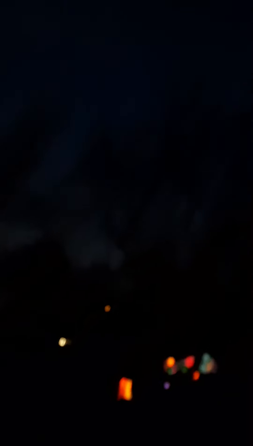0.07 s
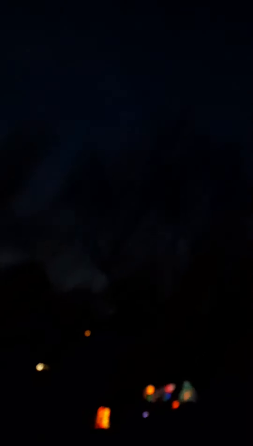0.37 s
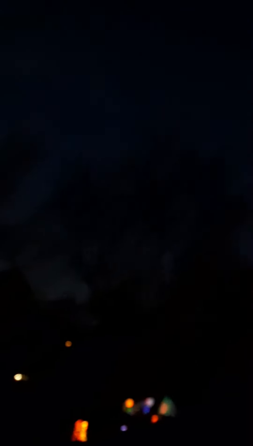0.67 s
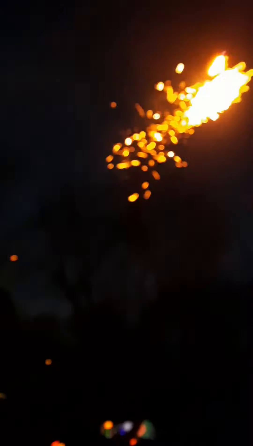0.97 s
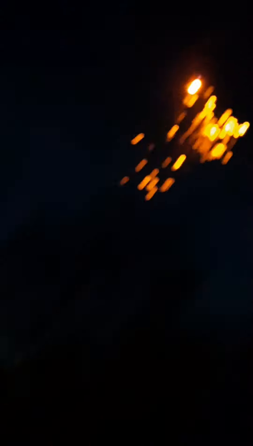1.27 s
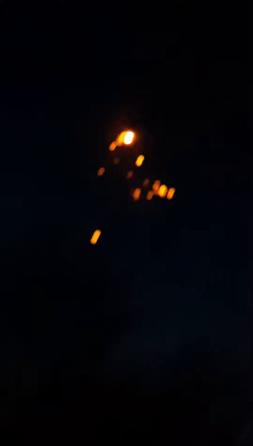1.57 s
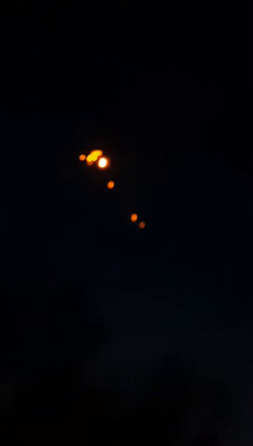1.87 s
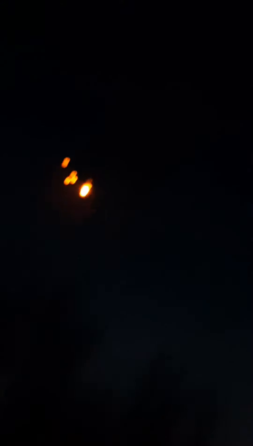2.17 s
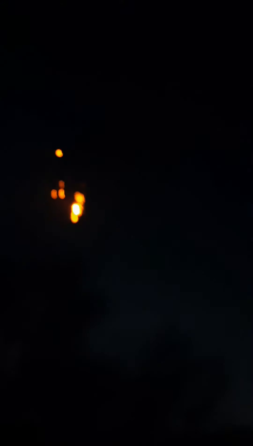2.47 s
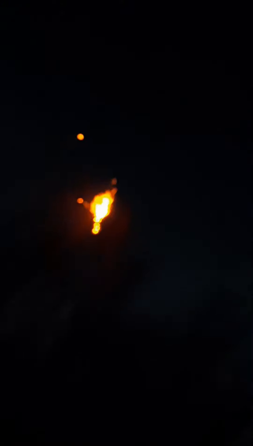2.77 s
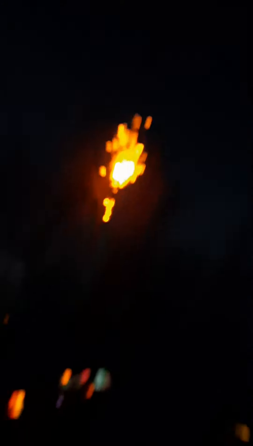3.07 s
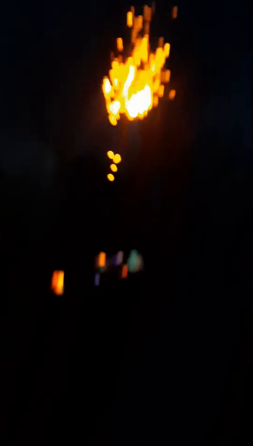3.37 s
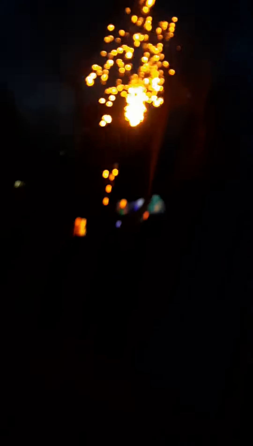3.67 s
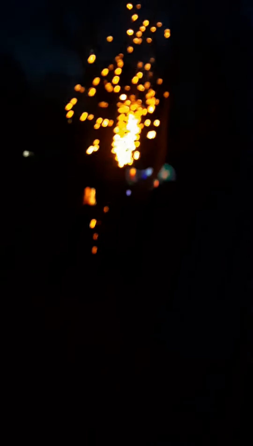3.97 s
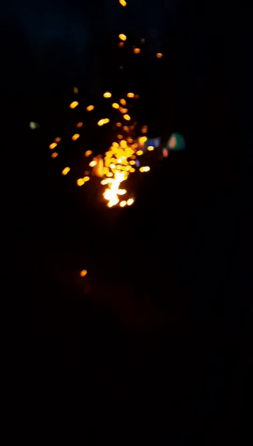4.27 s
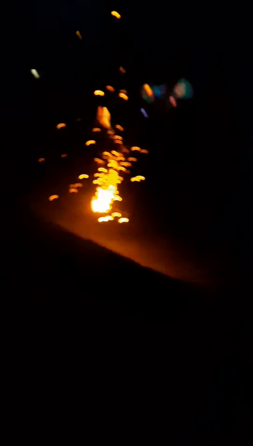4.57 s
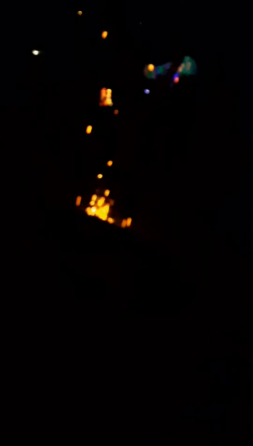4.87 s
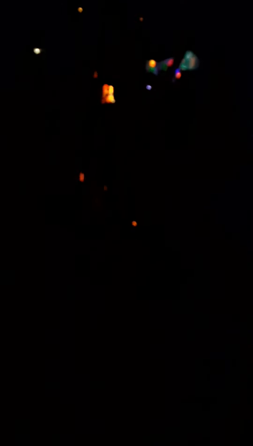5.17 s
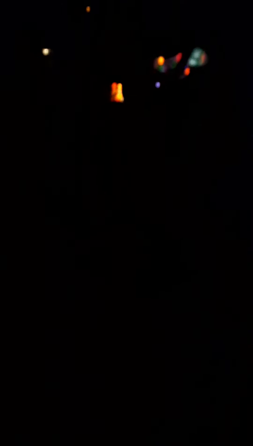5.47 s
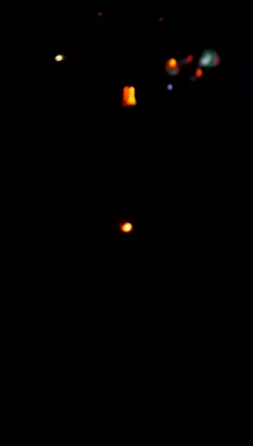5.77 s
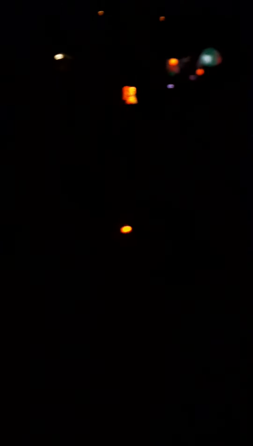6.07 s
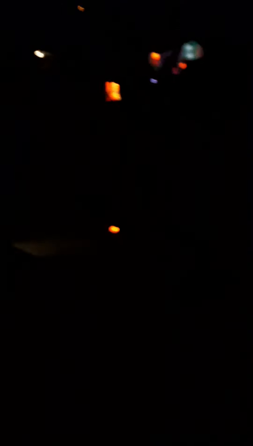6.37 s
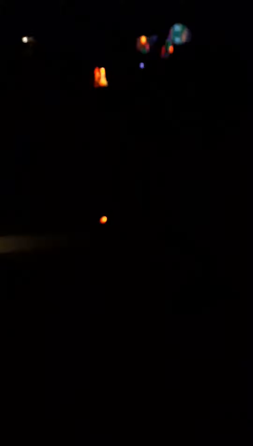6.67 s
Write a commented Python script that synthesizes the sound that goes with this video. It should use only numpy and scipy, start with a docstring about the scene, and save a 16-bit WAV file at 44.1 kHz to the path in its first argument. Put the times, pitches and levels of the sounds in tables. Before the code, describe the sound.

The scene opens outdoors at night with the faint hum and hush of far traffic. At about 0.85 seconds a homemade cannon ignites with a sharp snap, followed almost instantly by one very loud blast, a deep boom from the barrel and a brief hiss of gas. Echoes slap back from houses and trees until about 1.5 seconds, and a low rumble dies away by around 2 seconds. The microphone's level ducks with the shot and creeps back. Around 2.6 seconds a soft, low rush swells, then slowly fades, with a very faint fizz of sparks between 3 and 5 seconds. From 5.5 seconds clothing rustles quietly close to the microphone, and a small hard object gives scattered light clicks. It knocks with a dull thud at about 6.3 seconds and makes a short, rattling scrape near 6.7 seconds, all far quieter than the shot.

```python
"""Outdoors at night, over the hum and hush of far traffic, a homemade cannon fires a burning shot.
Ignition snaps in the chamber, the blast sets the barrel booming, and houses and trees reflect it as
echoes and a rumble. The microphone's gain ducks and creeps back. A soft, low background rush swells
and slowly fades, with a faint fizz of sparks; close by, clothing rustles and a small hard object
clicks, knocks and scrapes."""
import sys
import numpy as np
from scipy import signal
from scipy.fft import rfft, irfft, next_fast_len
from scipy.io import wavfile
from scipy.ndimage import uniform_filter1d, minimum_filter1d, map_coordinates

SR = 44100
rng = np.random.default_rng(int(sys.argv[2]) if len(sys.argv) > 2 else 0)


def log_audio(samples):
    """Write samples as a 16-bit WAV file to the path given in sys.argv[1]."""
    # one column per channel
    frames = np.atleast_2d(samples).T
    # limit to full scale, then quantise
    limited = np.clip(frames, -1, 1)
    pcm = np.round(limited * 32767).astype(np.int16)
    wavfile.write(sys.argv[1], SR, pcm)


N = 300321


def amp(db):
    """Amplitude ratio of a level in decibels."""
    return np.exp(np.asarray(db) * (np.log(10) / 20))


def unit(x):
    """Normalisation to rms 1."""
    return x / np.sqrt(np.mean(x ** 2) + 1e-20)


def along(points, hz):
    """Interpolation of (Hz, value) points on a logarithmic frequency axis."""
    freqs, values = np.transpose(points)
    return np.interp(np.log(hz + 1), np.log(freqs + 1), values)


def swell(s, db, rise, fall):
    """Exponential growth to a peak at s seconds, then exponential decay."""
    t = np.arange(N) / SR
    return amp(db) * np.exp(-np.minimum(np.maximum((s - t) / rise, (t - s) / fall), 20))


def fade_in(s, rise):
    """A smooth onset: the gain climbs from 0 to 1 around s seconds."""
    return (1 + np.tanh((np.arange(N) / SR - s) / (2 * rise))) / 2


def wobble(rate, size=N):
    """Random modulation: a smooth curve through rate knots a second."""
    knots = rng.standard_normal(int(size * rate / SR) + 4)
    fine = np.arange(8 * len(knots) - 8) / 8
    return np.interp(np.arange(size) * rate / SR, fine, map_coordinates(knots, [fine]))


def filtered(x, response):
    """Linear filtering: the spectrum of x is multiplied by response(Hz)."""
    n = x.shape[-1]
    padded = next_fast_len(n + 8192)
    return irfft(rfft(x, padded) * response(np.fft.rfftfreq(padded, 1 / SR)), padded)[..., :n]


def causal(gain_db, size=8192):
    """Minimum phase: the sharpest pulse whose spectrum follows gain_db(Hz)."""
    cepstrum = irfft(np.log(amp(gain_db(np.fft.rfftfreq(size, 1 / SR)))))
    cepstrum[1:size // 2] *= 2
    cepstrum[size // 2 + 1:] = 0
    return irfft(np.exp(rfft(cepstrum)))


def diffuse(size, apart_hz=1100):
    """A diffuse field: white noise, coherent between channels in the bass, incoherent in the treble."""
    mid, side = rng.standard_normal((2, size))
    side = filtered(side, lambda hz: (hz + 70) / np.hypot(hz + 70, apart_hz))
    return np.array([mid + side, mid - side]) / np.sqrt(2)


def rush(spectrum, size=N):
    """Spectral shaping: coloured diffuse noise of rms 1."""
    return unit(filtered(diffuse(size), lambda hz: amp(along(spectrum, hz))))


def lean(x, balance):
    """Level panning tilts each frequency to the left or right."""
    return filtered(x, lambda hz: amp(np.outer([.5, -.5], along(balance, hz))))


def add(track, s, sound):
    """Superposition of a sound on the track at s seconds."""
    start = round(s * SR)
    track[:, start:start + sound.shape[-1]] += sound[..., :N - start]


def ring(modes, start, attack):
    """Free vibration: damped modes, all excited at one moment."""
    out = np.zeros((1, N))
    t = np.arange(int(SR * max(t60 for *_, t60 in modes))) / SR
    sound = sum(amp(db - 60 * t / t60) * np.sin(2 * np.pi * hz * t) for hz, db, t60 in modes)
    add(out, start, sound * (1 - np.exp(-t / attack)))
    return out


def cracks(rows, spectrum, ragged_db, right_lead=2, front_t60=0.0055, order=2):
    """Impulsive arrivals: a ragged front, then scatter; each level is the energy spread over 5 ms."""
    out, t = np.zeros((2, N)), np.arange(SR // 8) / SR
    pulse = causal(lambda hz: along(spectrum, hz))
    burst = lambda db, t60: amp(db) * unit(diffuse(len(t)) * amp(-60 * t / t60)) / np.sqrt(len(t))
    for s, db, scatter_db, t60, corner_hz, pan_db in rows:
        spray = burst(ragged_db, front_t60) + burst(scatter_db, t60)
        spray[0, right_lead] -= 1  # the front reaches the left port a few samples late
        spray[1, 0] -= 1
        lowpass = signal.butter(order, min(corner_hz, .45 * SR), fs=SR, output="sos")
        sound = signal.fftconvolve(signal.sosfilt(lowpass, spray), pulse[None], axes=1)
        sound *= np.sqrt(.005 * SR * 2 / np.sum(sound ** 2))
        add(out, s, sound * amp(db + np.array([[pan_db], [-pan_db]]) / 2))
    return out


# Swells of an engine. Each row: peak time in seconds, level in dB, rise and fall in seconds.
ENGINE_SWELLS = [(0, -62, .1, 0.2006), (.66, -52.5, 0.089, 0.252), (1.95, -60, .4, .25),
                 (6.0, -61, .08, 0.25)]
# The hush of traffic. Each row: frequency in Hz, spectral density in dB.
HUSH_SPECTRUM = [(20, -19), (33, -15.5), (45, 3), (110, 3), (220, 3), (400, -2), (800, -4), (1600, -13),
                 (2200, -21), (2650, -37), (5500, -39), (9000, -51), (12000, -42.5), (16000, -42)]

def traffic(hush_db=-53.0, hum_db=-68, hum_hz=88, waver_hz=1.8, rough=.28):
    """Amplitude and frequency modulation roughen a far engine's drone over a broadband hush."""
    phase = 2 * np.pi * np.cumsum(hum_hz + waver_hz * wobble(5)) / SR
    effort = amp(hum_db) + sum(swell(*rev) for rev in ENGINE_SWELLS)
    sidebands = rough * (wobble(28) * np.sin(phase) + wobble(28) * np.cos(phase))
    hum = effort * unit((np.sin(phase) + sidebands) * amp(1.9 * wobble(9.5)))
    return amp(hush_db + 0.72 * wobble(5.9)) * rush(HUSH_SPECTRUM) + hum


# Pressure fronts. Each row: start in seconds, level in dB, relative scatter in dB,
# its t60 in seconds, treble corner in Hz, leftward pan in dB.
IGNITION_FRONTS = [(.8468, -10.5, -1, 0.022, 2199, 3.5), (.8492, -11, 11.5, 0.03, 15160, -3)]
BLAST_FRONTS = [(.8809, -2, -2.5, .014, 9500, 0), (.8862, -22, 14, .035, 9000, 0),
                (.8882, -13.5, -3, .03, 1000, 0)]  # the blast, a spit of hot gas, the bounce off the ground
# Ignition, blast and gas jet. Each row: frequency in Hz, spectral density in dB.
SNAP_SPECTRUM = [(100, -31.5), (380, -21.5), (700, -0.5), (900, -8.5), (1100, -3.5), (1800, 1.5),
                 (2700, -17), (4700, -7), (7200, -16.5), (9000, -13.5), (13000, -16)]
MUZZLE_SPECTRUM = [(6, -45), (25, -19), (70, -2), (150, 2), (270, -4), (380, -0.5), (750, -5), (1300, -11),
                   (2000, -7), (2650, -11), (3100, -19), (4250, -13), (6500, -23), (7300, -22), (8600, -31),
                   (11300, -18), (15000, -16)]
JET_SPECTRUM = [(1500, -25), (3000, -10), (4500, 0), (6000, 1), (7500, -6), (9000, -12), (11500, -5),
                (16000, -8)]
# Decaying tones. Each row: frequency in Hz, level in dB, t60 in seconds.
CHAMBER_MODES = [(705, -16, .04), (1104, -13.5, .028), (1790, -17, 0.017), (2050, -25.5, .055),
                 (3020, -29, .04), (4350, -27, .04), (4800, -28, 0.043), (7200, -25, 0.045),
                 (11150, -28, .035)]
BOOM_TONES = [(72, -6, 0.145), (62, -20, .7), (137.2, -6.5, 0.089), (162.85, -17, .36), (197, -17, .1),
              (398, -12.5, .1), (562, -19, 0.11), (673, -28, .3), (796, -22, .09), (984, -28, .28),
              (1249, -26, 0.12), (1519, -28, .13), (2042, -27, .25), (2427, -25, 0.037), (4250, -29, 0.1)]  # the barrel's boom, and faint tones that ring on after the shot

def cannon():
    """Impulse excitation: ignition rings the chamber, the blast booms in the barrel, gas hisses out."""
    snap = cracks(IGNITION_FRONTS, SNAP_SPECTRUM, ragged_db=-6, right_lead=4)
    chamber = ring(CHAMBER_MODES, start=.8465, attack=0.00056)
    blast = cracks(BLAST_FRONTS, MUZZLE_SPECTRUM, ragged_db=-5)
    boom = ring(BOOM_TONES, start=.8840, attack=0.00085)
    hiss = swell(s=.925, db=-36, rise=.02, fall=.022) * rush(JET_SPECTRUM)
    return snap + chamber + blast + boom + hiss


# Scatter from the ground, near trees and far trees. Each row: start in seconds, level in dB,
# nominal t60 in seconds, rise in seconds, treble corner in Hz.
SCATTER_TAILS = [(0.853, -34.5, 0.37, .002, 15000), (.886, -21.5, 0.556, .002, 16000),
                 (.938, -21, 0.5, .002, 16000), (.945, -19.4, 0.95, .002, 16000),
                 (1.19, -46.3, 1.4, .02, 5000)]
# Air absorption. Each row: frequency in Hz, factor on the nominal t60.
AIR_DECAY = [(50, 1.05), (200, 1.22), (1200, 1.25), (2100, 1.08), (2900, .92), (6000, 0.64), (8500, .52),
             (13000, .42)]
# The scattered sound. Each row: frequency in Hz, spectral density in dB.
TREE_SPECTRUM = [(6, -52), (25, -17), (42, -4), (62, 14), (80, 11), (100, 7), (160, 6), (280, -5.5),
                 (480, -5), (650, -1.5), (780, -4.5), (930, -3), (1300, -7.7), (2300, -6.7), (3000, -13),
                 (5500, -11.5), (9000, -23), (13000, -20.5)]

def rumble(grain_db=1.8, surge_db=1.5, ripple_db=2.0):
    """Reverberation: countless small echoes roll away in surges; the air absorbs their treble first."""
    out = np.zeros((2, N))
    ripple = amp(ripple_db * rng.standard_normal((513, 1)))
    for s, db, t60, rise, corner_hz in SCATTER_TAILS:
        hz, t, bands = signal.stft(rush(TREE_SPECTRUM, size=2 * SR), SR, nperseg=1024)
        hz = hz[:, None]
        bands *= np.where(hz > 500, ripple, 1)  # crossing paths favour some frequencies
        bands /= np.hypot(1, (hz / corner_hz) ** 4)
        bands *= amp(-60 * t / (t60 * along(AIR_DECAY, hz)))
        tail = signal.istft(bands, SR, nperseg=1024)[1]
        age = np.arange(tail.shape[1]) / SR
        clumps = unit(amp(grain_db * wobble(350, len(age)) + surge_db * wobble(70, len(age))))
        add(out, s, amp(db) * tail * clumps * (1 - np.exp(-age / rise)))
    return out


# Echoes from houses and trees. Each row: arrival in seconds, level in dB, treble corner in Hz.
REFLECTIONS = [(0.9363, -5, 13000), (0.9500, -13.5, 7500), (0.9597, -17.5, 5000), (.9910, -12.5, 1250),
               (1.1703, -20, 950), (1.2950, -38, 700), (1.3450, -38, 700)]
# The reflected blast. Each row: frequency in Hz, spectral density in dB.
WALL_SPECTRUM = [(6, -51.5), (25, -24.5), (80, -5.5), (160, 7.5), (300, -7), (500, -6), (900, 0),
                 (1300, -1.5), (2100, -1.5), (3000, -10), (5500, -7), (9000, -23.5), (13000, -19.5)]

def echoes(first_t60=0.032, smearing=0.68, scatter_db=2.5, pan_db=-0.93):
    """Reflection: the longer its path, the duller and more smeared an echo returns."""
    fired, rows = BLAST_FRONTS[0][0], []
    for s, db, corner_hz in REFLECTIONS:
        delay_ratio = (s - fired) / (REFLECTIONS[0][0] - fired)
        rows.append((s, db, scatter_db, first_t60 * delay_ratio ** smearing, corner_hz, pan_db))
    return cracks(rows, WALL_SPECTRUM, ragged_db=3, order=4)


# Echoes from single trunks. Each row: arrival in seconds, level in dB, treble corner in Hz.
TRUNK_REFLECTIONS = [(1.0043, -24, 2400), (1.0085, -28, 2200), (1.0392, -19.5, 2300), (1.0660, -29, 1700),
                     (1.0845, -29, 2700), (1.1760, -41, 9000), (1.2190, -41, 2000), (1.4490, -41.5, 1100),
                     (1.5030, -53, 2600)]
# Their colour. Each row: frequency in Hz, spectral density in dB.
TRUNK_SPECTRUM = [(100, -12.5), (700, 1.5), (2100, 0), (3000, -6), (5500, -5), (7500, -15), (13000, -22.5)]

def trunk_echoes(scatter_db=1, t60=0.028):
    """Discrete reflections from single trunks tick through the rumble."""
    rows = [(s, db, scatter_db, t60, hz, 0) for s, db, hz in TRUNK_REFLECTIONS]
    return cracks(rows, TRUNK_SPECTRUM, ragged_db=2.0)


# Showers of sparks. Each row: peak time in seconds, level in dB, rise and fall in seconds.
SPARK_SHOWERS = [(3.08, -82, .08, .2), (3.62, -73.5, 0.2, 0.26), (4.85, -84, .15, .15)]
# Background rush and sparks. Each row: frequency in Hz, spectral density in dB.
RUSH_SPECTRUM = [(30, -16.5), (80, 5.5), (220, 9), (450, 6), (900, 3), (1600, 2), (2200, -9), (2700, -31.5),
                 (4500, -24), (9000, -36), (12000, -27.5), (16000, -24.5)]
SPARK_SPECTRUM = [(1500, -30), (3200, -4.5), (4700, 1.5), (7000, -7.5), (15000, -5.5)]

def night_rush(onset_s=2.6, rush_db=-55.6, fade_db_per_s=2.4, flutter_db=0.53, sputter_db=1.0):
    """Modulated noise: a soft, low background rush swells and slowly fades; sparks fizz faintly."""
    envelope = fade_in(onset_s, rise=0.22) * amp(rush_db - fade_db_per_s * (np.arange(N) / SR - onset_s))
    sputter = unit(amp(sputter_db * wobble(120) + 1.2 * wobble(12)))
    fizz = sum(swell(*shower) for shower in SPARK_SHOWERS) * sputter * rush(SPARK_SPECTRUM)
    return amp(flutter_db * wobble(11)) * envelope * rush(RUSH_SPECTRUM) + fizz


RUSTLE_S = 5.46  # the clothing starts to move
# Short scuffs of cloth. Each row: peak time in seconds, level in dB, fall in seconds.
CLOTH_SCUFFS = [(5.522, -68, 0.029), (5.652, -66.5, 0.0148), (5.9467, -47, 0.0036), (5.966, -48, 0.0183),
                (6.274, -46, 0.0105), (6.72, -63.5, 0.0246)]
# Steady rustle and scuffs. Each row: frequency in Hz, spectral density in dB.
RUSTLE_SPECTRUM = [(1500, -8), (2800, -5), (3500, -5), (4200, 0), (6000, 3), (7700, -2), (8700, -12),
                   (11000, -3.5), (16000, -3)]
SCUFF_SPECTRUM = [(100, -3), (700, 3), (1200, 1), (1750, -2), (2060, 6), (2500, 2), (3000, -7), (3800, 2),
                  (4700, -3.5), (5700, 0), (7500, -2.5), (8700, -18), (11300, -10.5), (16000, -16)]

def clothing(start_db=-74, growth_db_per_s=4, grain_db=2.0):
    """Friction noise: clothing scuffs, and rustles louder as it moves ever more."""
    effort_db = start_db + growth_db_per_s * (np.arange(N) / SR - RUSTLE_S) + 1.8 * wobble(9)
    rustle = amp(effort_db) * fade_in(RUSTLE_S, rise=.025) * rush(RUSTLE_SPECTRUM)
    scuffs = sum(swell(s, db, 0.67 * fall, fall) for s, db, fall in CLOTH_SCUFFS) * rush(SCUFF_SPECTRUM)
    return (rustle + scuffs) * unit(amp(grain_db * wobble(820)))


# Clicks of a small hard object. Each row: start in seconds, level in dB, leftward pan in dB.
CONTACTS = [(5.4656, -66, -0.5), (5.541, -62, -1), (5.5595, -59, -3), (5.645, -58, 0.5), (5.653, -62, -3),
            (5.946, -48, -5.5), (6.038, -43, -1.5), (6.0484, -48.5, 2.5), (6.089, -57, 2), (6.217, -47, -3),
            (6.2273, -49, -5), (6.2562, -34.5, -9.5), (6.6587, -50.5, 3.5)]
# A light click. Each row: frequency in Hz, spectral density in dB.
CLICK_SPECTRUM = [(6, -39.5), (60, -4.5), (300, 6.5), (800, 2), (2000, 1), (3100, -8), (3750, 2), (4800, 5),
                  (5300, 2), (5850, 11), (6700, -2), (7400, 0), (8700, -6), (11500, -3.5), (16000, -1.5)]
CLICK_T60_S, CLICK_SCATTER_DB = 0.0166, 4

def clicks(typical_db=-44.5, typical_hz=9500, brighter_db=20.5, shorter_db=6.5):
    """Impact noise: a harder contact is brighter and shorter."""
    rows = []
    for s, db, pan_db in CONTACTS:
        t60 = CLICK_T60_S / 2 ** ((db - typical_db) / shorter_db)
        corner_hz = typical_hz * 2 ** ((db - typical_db) / brighter_db)
        rows.append((s, db, CLICK_SCATTER_DB, t60, corner_hz, pan_db))
    return cracks(rows, CLICK_SPECTRUM, ragged_db=-2)


# Resonances of the object. Each row: frequency in Hz, relative level in dB, t60 in seconds.
SHELL_MODES = [(1550, -15.5, 0.024), (2018, -6.5, 0.021), (2486, -5.5, 0.0171), (3660, -25, 0.0153),
               (5730, -11, 0.0118)]

def shell(contacts):
    """Modal ringing: every contact excites the same resonances of the object."""
    return sum(amp(db) * ring(SHELL_MODES, s, attack=0.00022) for s, db, *_ in contacts)


def ticks(count=24, level_db=-72.5, spread_db=2, corner_hz=6004):
    """Random impulses: faint ticks come while the clothing moves."""
    chance = rng.random((count, 2))
    times = RUSTLE_S + (N / SR - RUSTLE_S) * (np.arange(count) + chance[:, 0]) / (count + 1)
    levels = level_db + spread_db * (2 * chance[:, 1] - 1)
    rows = [(s, db, CLICK_SCATTER_DB, CLICK_T60_S, corner_hz, 0) for s, db in zip(times, levels)]
    return cracks(rows, CLICK_SPECTRUM, ragged_db=-5)


# The object strikes and drops back. Each row: start in seconds, level in dB, relative scatter in dB,
# its t60 in seconds, treble corner in Hz, leftward pan in dB.
KNOCK_IMPACTS = [(6.2563, -38.5, 2.5, 0.0144, 2200, -6), (6.2632, -40, 2.5, 0.11, 3000, 10)]
# Their colour. Each row: frequency in Hz, spectral density in dB.
KNOCK_SPECTRUM = [(6, -40), (60, 4), (300, 14), (700, 12), (1300, 9), (2400, 7), (3100, -7), (4200, 1),
                  (5900, 10.5), (6800, -4), (7500, 2), (8700, -3), (12500, 1), (16000, -6)]
# The thud as it settles. Each row: frequency in Hz, level in dB, t60 in seconds.
THUD_MODES = [(230, -43, .07), (585, -41, .035), (724, -31, 0.02), (973, -44, 0.07), (1290, -43, .035)]

def knock():
    """Damped vibration: the object knocks against something and settles with a dull thud."""
    thud = ring(THUD_MODES, start=6.2635, attack=0.00041)
    return cracks(KNOCK_IMPACTS, KNOCK_SPECTRUM, ragged_db=-5) + thud


def rattle(start_s=6.654, first_db=-39, gap_s=.0022, count=7, loss_db=0.2):
    """Chatter: a quick, uneven run of weakening contacts rings the object as it scrapes."""
    k = np.arange(count)
    times = start_s + gap_s * (k + rng.uniform(-.5, .5, count))
    return shell(zip(times, first_db - loss_db * k))


# The scraping object. Each row: frequency in Hz, spectral density in dB.
SCRAPE_SPECTRUM = [(100, -9), (1200, -7), (1750, -3), (2050, 8), (2250, 3), (2500, 7), (3000, -1),
                   (3600, -13), (4500, -7), (5000, 1), (5800, 1), (7500, -7), (9000, -15), (11000, -5.5),
                   (16000, -6.5)]

def scrape(grit_db=3.0):
    """Stick-slip friction: the object catches and slips in a short burst of gritty noise."""
    grit = unit(amp(grit_db * wobble(1500)))
    return swell(s=6.6595, db=-39.3, rise=.0052, fall=.0085) * grit * rush(SCRAPE_SPECTRUM)


# Stereo balance of the distant sounds. Each row: frequency in Hz, leftward pan in dB.
DISTANT_BALANCE = [(200, -0.5), (1300, 0), (2300, -7), (3500, 0.5), (6000, -1.5)]

def scene():
    """Superposition of the shot and its echoes, the distant sounds and the handling close by."""
    shot = cannon() + echoes() + rumble() + trunk_echoes()
    distant = lean(traffic() + night_rush(), DISTANT_BALANCE)
    handling = clothing() + shell(CONTACTS) + rattle() + scrape()
    to_right = amp([[-1.5], [1.5]])
    return shot + distant + handling * to_right + knock() + clicks() + ticks()


def gain_control(x, threshold_db, depth_db, hold_s, release_s):
    """Compression: a loud sound pulls the gain down at once; it waits, then climbs back evenly in dB."""
    power = np.abs(uniform_filter1d(np.mean(x ** 2, axis=0), size=256))
    cut_db = np.clip(10 * np.log10(power + 1e-12) - threshold_db, 0, depth_db)
    span = 2 * int(hold_s * SR / 2) + 1
    held_db = -minimum_filter1d(-cut_db, span, origin=span // 2, mode="constant")
    climb_db = np.arange(N) / SR * depth_db / release_s
    return x * amp(climb_db - np.maximum.accumulate(held_db + climb_db))


# Peaks and notches of the microphone housing. Each row: centre in Hz, half-width in Hz, gain in dB.
HOUSING_BANDS = [(294.6, 26, -2), (480, 35, -2.5), (1539, 41, 4), (1839, 140, -2), (2059, 110, 3),
                 (3390, 80, 3), (7300, 450, 2.5), (8993, 1100, -10)]
# Balance of its two ports. Each row: frequency in Hz, leftward pan in dB.
PORT_BALANCE = [(100, 0), (600, -1), (1400, -4), (2500, -2), (5000, 0.5), (13000, 1)]

def record(dry, low_cut_hz=39, top_hz=16200):
    """Transduction: housing resonance colours the sound before gain control, overload and band limits."""
    housing = causal(lambda hz: sum(db * np.exp(-((hz - centre) / width) ** 2)
                                    for centre, width, db in HOUSING_BANDS))
    x = lean(signal.oaconvolve(dry, housing[None], axes=1)[:, :N], PORT_BALANCE)
    x = gain_control(x, threshold_db=-24, depth_db=7.0, hold_s=1.136, release_s=0.997)
    x = x / (1 + (x * x / .8) ** 2) ** (1 / 4)  # soft saturation
    x = signal.sosfilt(signal.butter(2, low_cut_hz, "highpass", fs=SR, output="sos"), x)
    return filtered(x, lambda hz: np.clip(.5 + (top_hz - hz) / 700, 0, 1))


dry = scene()
out = record(dry)
log_audio(out)
```